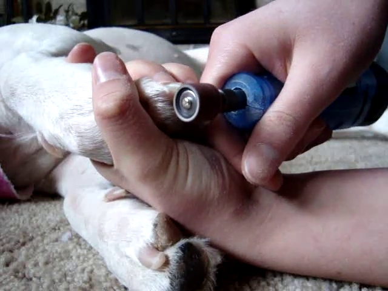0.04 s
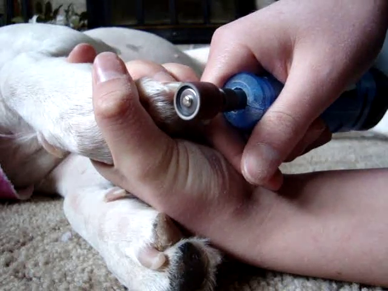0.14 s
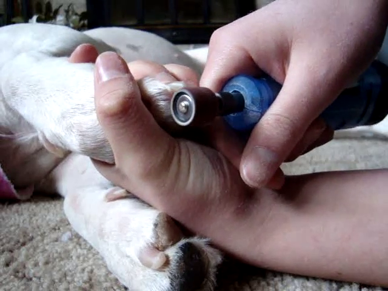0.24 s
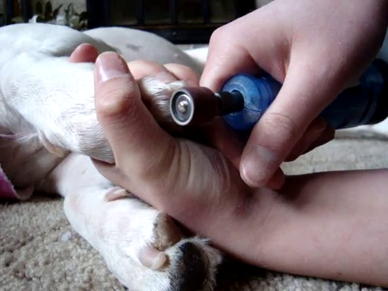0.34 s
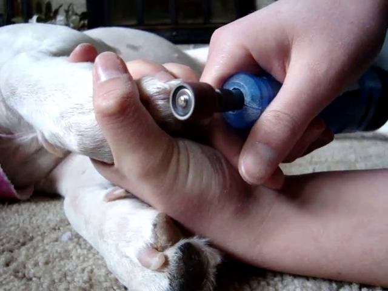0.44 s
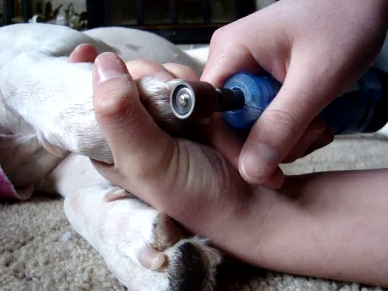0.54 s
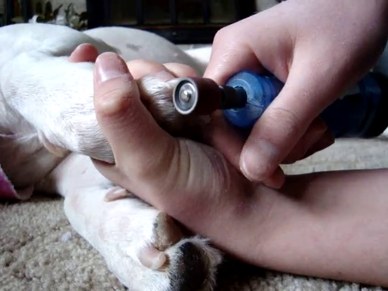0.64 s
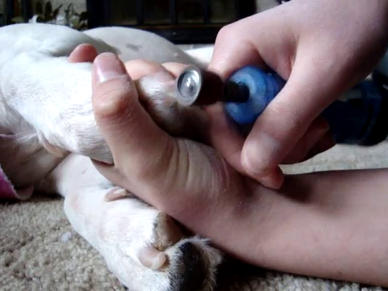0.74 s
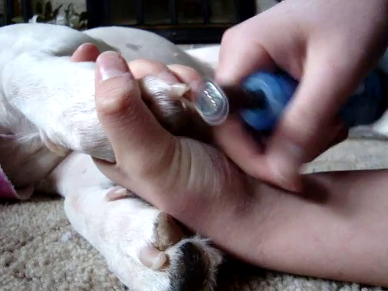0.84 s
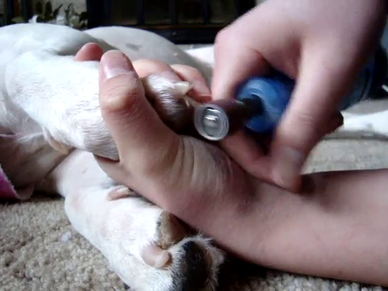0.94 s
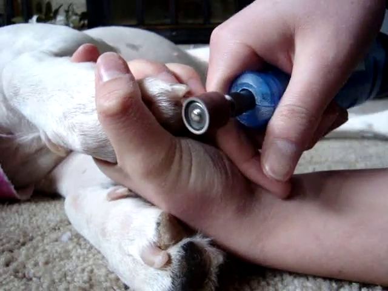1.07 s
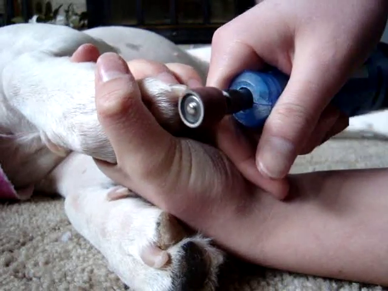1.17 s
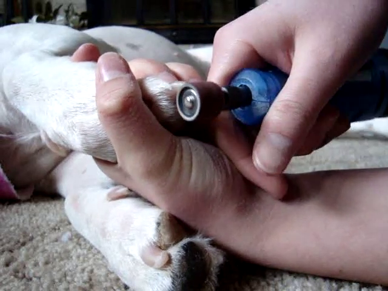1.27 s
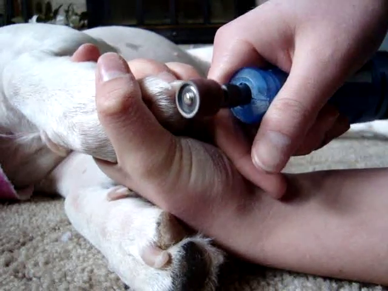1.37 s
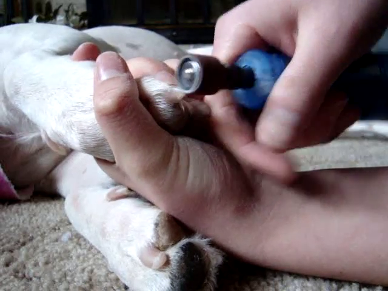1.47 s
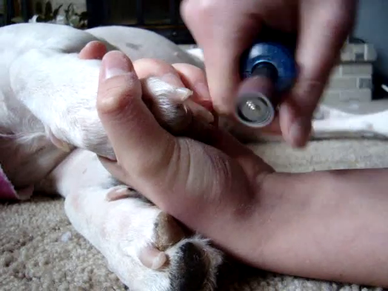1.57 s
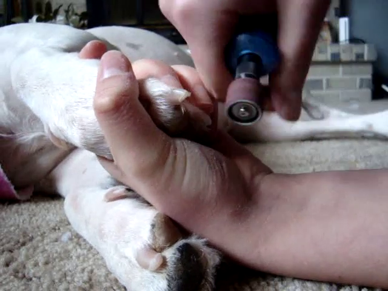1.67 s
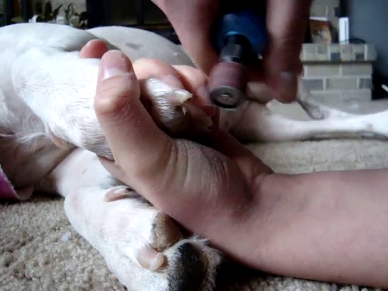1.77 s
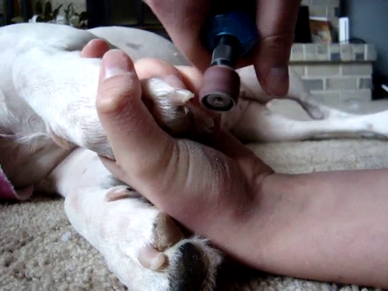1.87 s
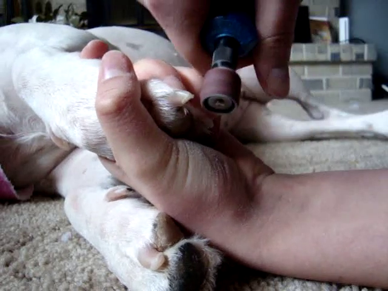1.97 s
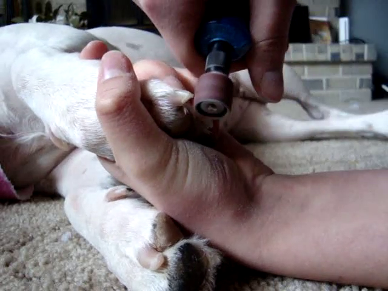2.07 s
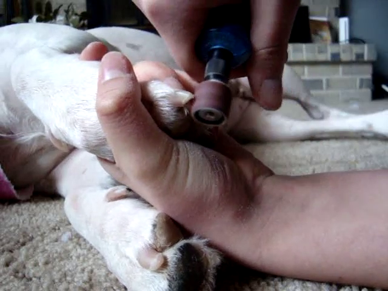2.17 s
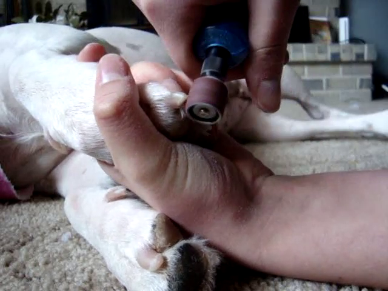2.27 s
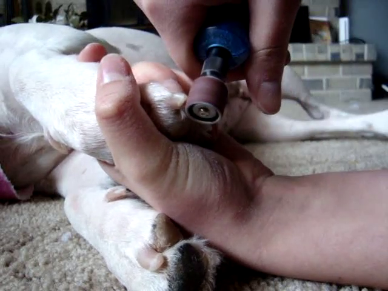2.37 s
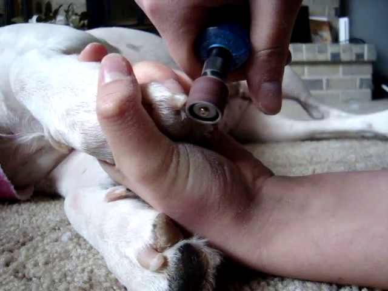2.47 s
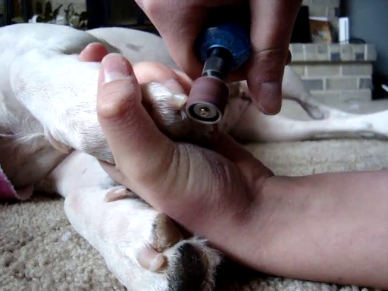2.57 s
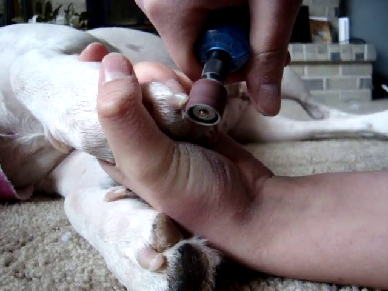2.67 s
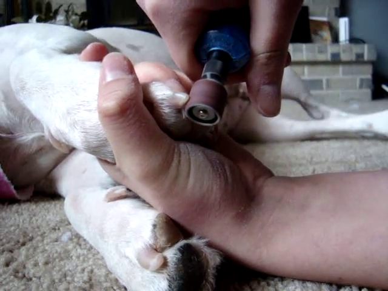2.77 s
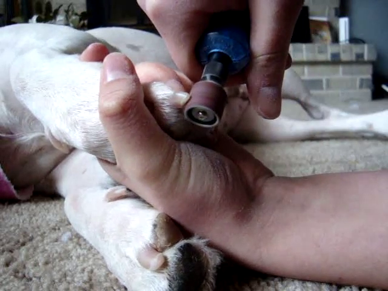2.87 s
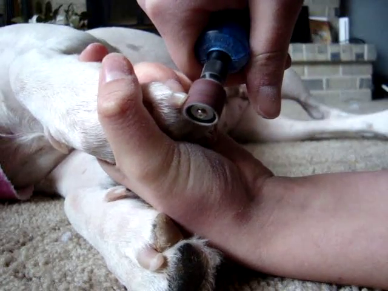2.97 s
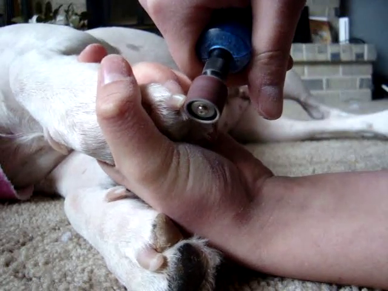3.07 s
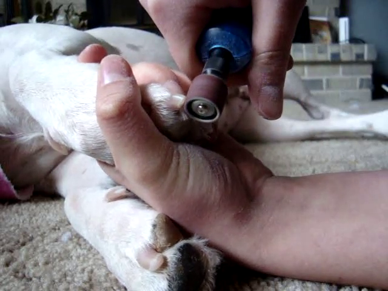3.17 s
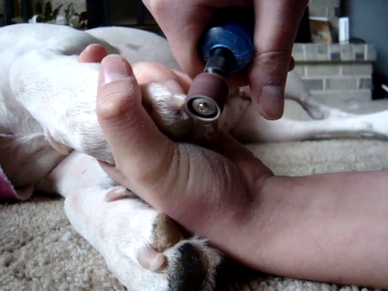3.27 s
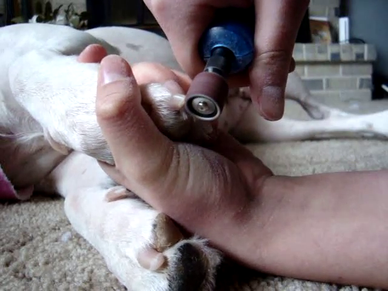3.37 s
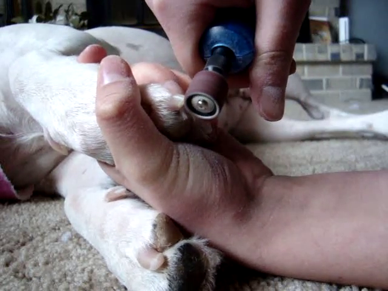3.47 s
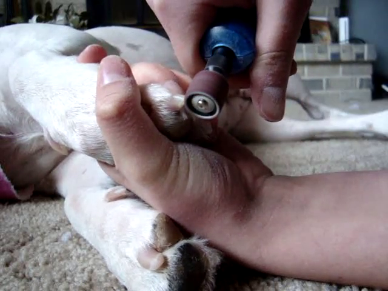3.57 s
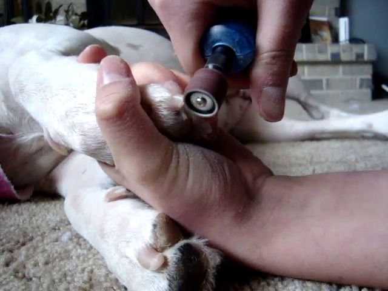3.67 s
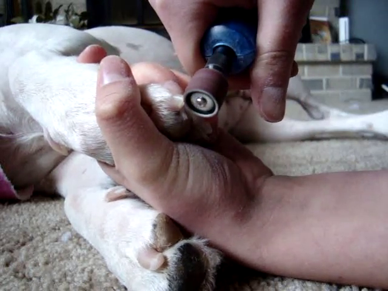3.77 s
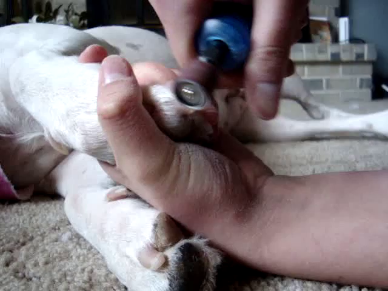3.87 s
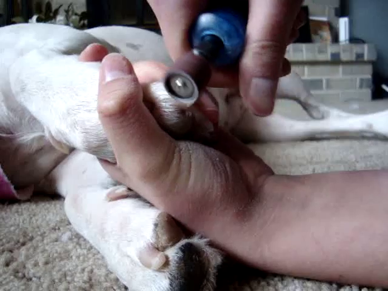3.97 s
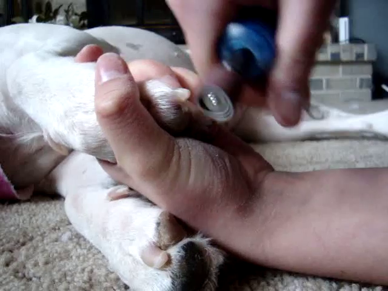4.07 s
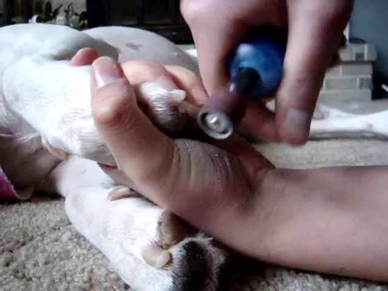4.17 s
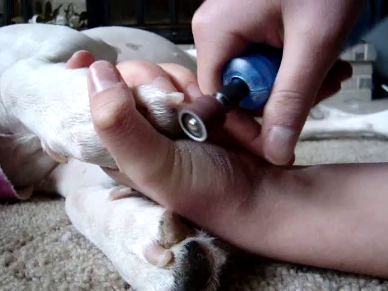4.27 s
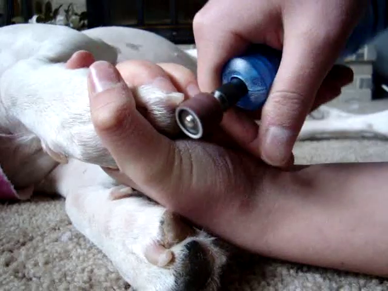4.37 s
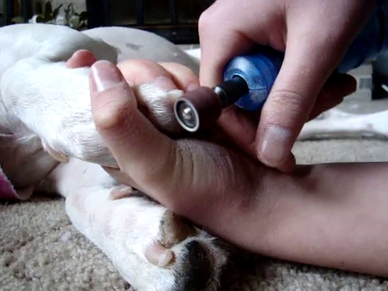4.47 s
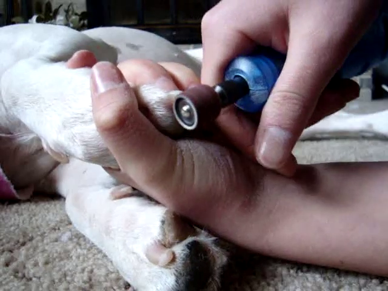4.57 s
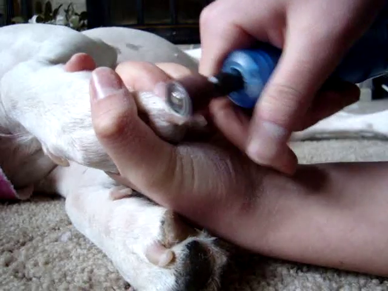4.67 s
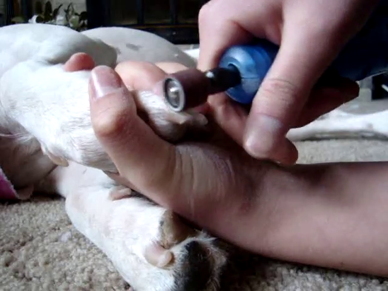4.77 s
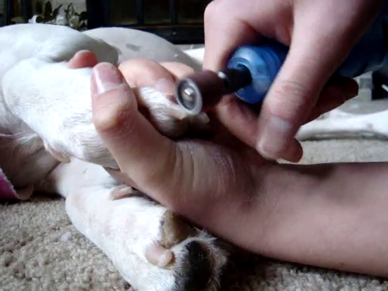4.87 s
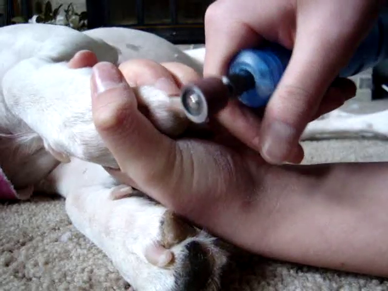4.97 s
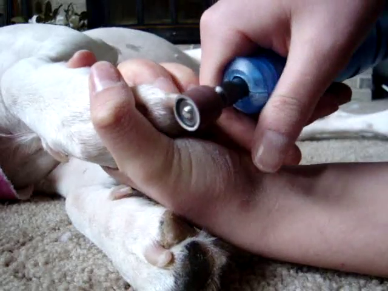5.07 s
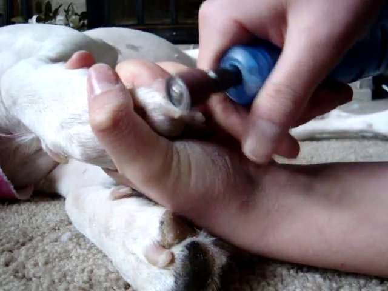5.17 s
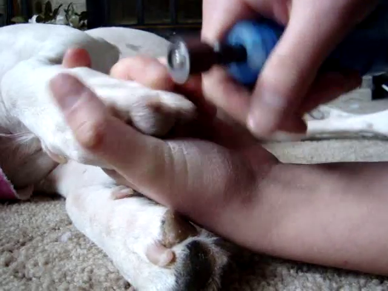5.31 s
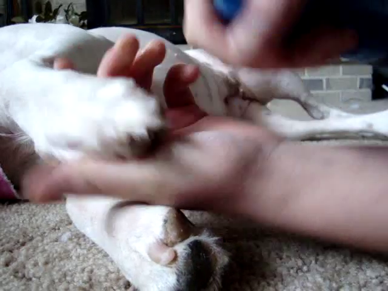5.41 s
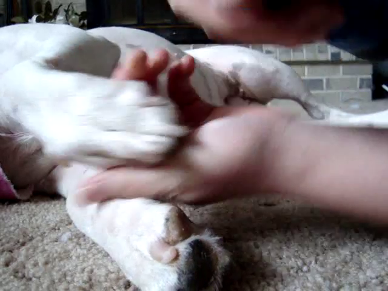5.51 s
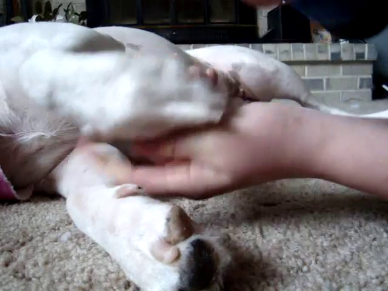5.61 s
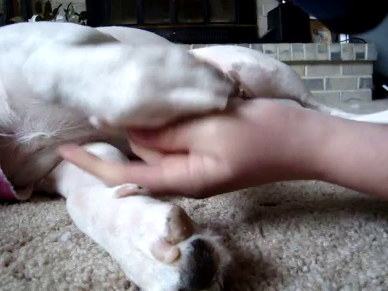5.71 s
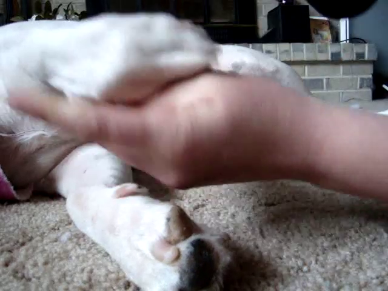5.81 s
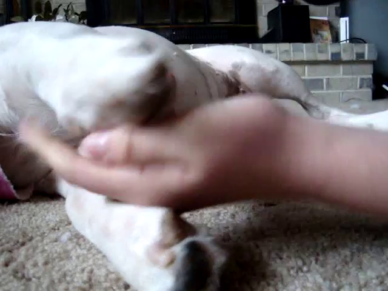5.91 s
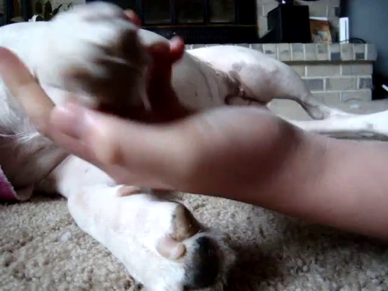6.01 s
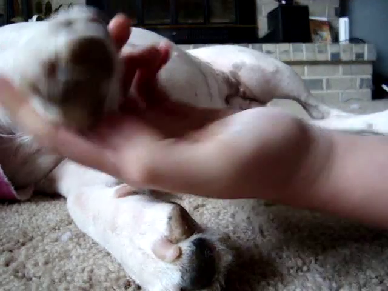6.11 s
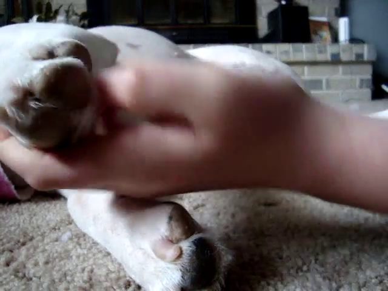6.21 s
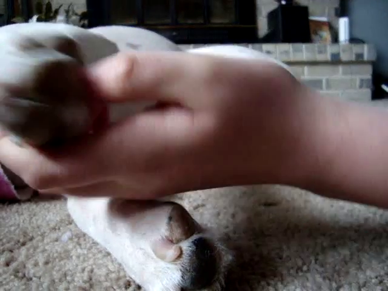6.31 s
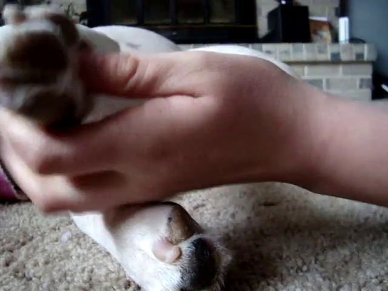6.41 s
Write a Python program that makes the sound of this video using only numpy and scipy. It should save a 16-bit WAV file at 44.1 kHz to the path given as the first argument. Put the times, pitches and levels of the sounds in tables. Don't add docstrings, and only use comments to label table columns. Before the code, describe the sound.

Raspy, ringing bursts of nail grinding interrupt a steady high motor whine, which sags under each contact and climbs back in the pauses.

```python
import sys
import numpy as np
from scipy import signal
from scipy.fft import rfft, irfft, next_fast_len
from scipy.io import wavfile
from scipy.ndimage import uniform_filter1d, map_coordinates

SR = 44100
rng = np.random.default_rng(int(sys.argv[2]) if len(sys.argv) > 2 else 0)


def transcribe(signal):
    frames = np.atleast_2d(signal).T
    limited = np.clip(frames, -1, 1)
    pcm = np.round(limited * 32767).astype(np.int16)
    wavfile.write(sys.argv[1], SR, pcm)


def amplitude_ratio(level_db):
    exponent = np.asarray(level_db, float) / 20
    return 10 ** exponent


N = 284445

# time in seconds, pressure in dB, slip off the
# ringing seat in dB, sharp grit reaching the nail in dB, share of the scrape that repeats each turn (0-1).
SIDE_STROKES = [
    [(0.0, -22, -5.5, -9, 0.95), (0.12, -19, -4.5, -8, 0.99), (0.28, -22, -5.0, -9.5, 0.84),
     (0.355, -17.5, -5.5, -7.5, 0.7), (0.42, -21, -3.5, -8.5, 0.83), (0.79, -19, -5, -6.5, 1),
     (0.85, -18.5, -7, -7.5, 0.27), (0.89, -21.5, -8.5, -7, 0), (0.962, -23.5, -9.5, -6.5, 0.1)],
    [(1.36, -32, -2, -8.5, 0.4), (1.368, -25, -3.5, -8, 0.4), (1.41, -24, -3.5, -8.0, 0.7),
     (1.47, -20.5, -2.5, -6.5, 0.8), (1.524, -17.0, -3.5, -6.5, 0.2), (1.556, -25, -5.5, -3.5, 0.2),
     (1.585, -35.5, -1, -5.5, 0.1)],
]
TIP_STROKES = [
    [(2.342, -22, -8.0, -5.5, 0.51), (2.37, -22, -4.5, -8, 0.54), (2.418, -15, -4.5, -11.5, 0.54),
     (2.6, -16, -3.0, -12, 0.66), (2.7, -17.0, -4.5, -13, 1), (2.92, -18.0, -6.5, -10, 0.81),
     (3.02, -17.0, -9.5, -10, 0.87), (3.09, -16.0, -7, -9.5, 0.92), (3.16, -16.0, -7.5, -5, 1)],
    [(3.165, -16.5, -7.5, -7, 0.95), (3.24, -14.5, -10.5, -14, 0.98), (3.42, -17.5, -5.5, -14.0, 0.95),
     (3.46, -15, -8.5, -16, 0.91), (3.62, -15.5, -4.5, -14.0, 0.86), (3.65, -16.0, -3, -14.0, 0.63),
     (3.965, -16.0, -3, -9.5, 0.5), (4.02, -25.0, -5.5, -9.5, 0.5), (4.075, -28.0, 0, -7, 0.75)],
]
EDGE_STROKES = [
    [(4.525, -26.5, -11, -4, 0.5), (4.54, -24.5, -6.5, -8.0, 0.53), (4.645, -15.5, -5.5, -7.5, 0.44),
     (4.77, -15.5, -6, -10.5, 0.94), (4.812, -15.0, -4.5, -12.5, 0.33), (4.845, -14.5, -12.5, -14.5, 0.86),
     (4.94, -18.0, -6.5, -12.5, 0.79), (5.055, -16.0, -6, -9.5, 0.84), (5.072, -21, -8, -9.5, 0.77)],
    [(5.14, -17, -13, -9.5, 0.5), (5.148, -17.5, -7, -12.5, 0.7), (5.23, -17.5, -9.5, -15, 0.82),
     (5.272, -12.0, -5.5, -10.5, 0.22), (5.302, -15.5, -14.5, -14, 0.74), (5.34, -18.5, -6.5, -15, 0.49),
     (5.374, -24.0, -11, -8.5, 0.33), (5.382, -24.5, -8, -20.5, 0.3)],
]
# frequency in Hz, level in dB per Hz.
SIDE_BODY = [(18, -78), (30, -62), (276, -44.5), (344, -42), (408, -36.5), (890, -35), (1030, -21),
             (1640, -12), (1900, -4.5), (2540, -7), (2800, 0), (3320, -2), (3850, -9), (8810, -17.5),
             (10200, -28), (13300, -73), (22000, -120)]
TIP_BODY = [(18, -99), (30, -75), (398, -48.5), (574, -43), (958, -42.5), (1060, -24.5), (1310, -28.5),
            (1760, -15.5), (2540, -13.5), (2870, 0.5), (3490, -21), (4450, -15), (5680, -26), (8600, -25.5),
            (10200, -34), (13300, -68), (22000, -120)]
EDGE_BODY = [(18, -77), (30, -54), (169, -63), (912, -38), (1110, -17), (1450, -22), (1810, -8), (2300, -3),
             (2540, -9.5), (3160, 3), (3850, -8.5), (5540, -10), (7250, -19), (8390, -15.5), (10200, -30),
             (13300, -67), (22000, -120)]
# order in cycles per turn, level in dB over the ring.
SIDE_SONG = [
    [(16, -5), (24, -13), (29, -7), (20, -16), (15, -12), (9, -27.5)],
    [(15, -5), (9, -6), (24, -10)],
]
TIP_SONG = [
    [(24, -9.5), (25, -11.5), (20, -9), (9, -28.5), (15, -22.5), (19, -10.5)],
    [(24, -4.5), (25, -6), (20, -13), (13, -18), (15, -17), (23, -13)],
]
EDGE_SONG = [
    [(26, -5), (18, -13.5), (15, -14.5)],
    [(26, -7.5), (15, -10)],
]
# time in seconds, speed in turns per second.
SIDE_SHAFT = [
    [(0, 117.6), (.09, 115.9), (.32, 117), (.38, 121.9), (.43, 119.2), (.49, 120.8), (.65, 116.7),
     (.86, 114.5), (.975, 128)],
    [(1.355, 133.6), (1.42, 127.3), (1.47, 120.9), (1.52, 124.7), (1.58, 127.3)],
]
TIP_SHAFT = [
    [(2.335, 133.6), (2.39, 128.5), (2.43, 120.6), (2.51, 115.9), (2.62, 112.6), (2.8, 122.4),
     (2.96, 117.8), (3.02, 123.3), (3.14, 113.5)],
    [(3.15, 114.2), (3.23, 115.5), (3.32, 114.5), (3.59, 118.5), (3.65, 115.5), (3.92, 111.7),
     (3.95, 115.5), (4.02, 119.3), (4.085, 128.9)],
]
EDGE_SHAFT = [
    [(4.515, 133.4), (4.58, 129.6), (4.71, 118.8), (4.78, 109.6), (4.87, 112), (4.96, 123.6), (5.06, 125.3),
     (5.08, 127.9)],
    [(5.135, 131.9), (5.19, 124.9), (5.23, 124), (5.3, 115.5), (5.39, 128.5)],
]
# time in seconds, peak level in dB.
SNAGS = [
    (0.866, 1),
    (1.524, -6),
    (3.744, -7.5),
    (3.969, -1.5),
    (4.809, 1),
    (5.274, -5.5),
]
# frequency in Hz, level in dB.
KNOCK = [(100, -43), (500, -24), (1200, -10), (2000, -4), (3000, 2), (4500, -7), (7000, -16), (10200, -31)]
# time in seconds, peak level in dB, ring in Hz.
GRAZES = [
    (2.2119, -25, 3000),
    (2.219, -25, 2996),
    (2.226, -28.5, 2977),
    (2.244, -35.5, 2790),
    (2.2584, -49, 2810),
]
# order in cycles per turn, level in dB over the whirr.
FLANKS = [(7, -23), (8, -12.5), (10, -7.5), (11, -21.5), (14, -22), (16, -23), (18, -19), (26, -13),
          (27, -9.5), (30, -9), (33, -13), (36, -13), (42, -18.5), (43, -18.5), (45, -19.5), (48, -16.5),
          (54, -20.5), (60, -15), (72, -21.5)]
# time in seconds, nearness in dB, strong orders in dB over the whirr,
# turn from the 9th to the 15th order in dB, uncovering of the top in dB.
HOLD = [(1.0, 0.5, -2.5, 4, -2.5), (1.35, -2, 1.5, 1.5, 1.5), (1.62, 2, -0.5, 4.5, 2.5),
        (1.68, 0, -0.5, 0, 1), (1.76, 0, 6, 2.5, -2), (1.91, 0, 3, -3, 2), (1.97, 0, 1, 2.5, 2),
        (2.14, 1, -2.5, -7, 1), (2.33, 1, 3, -6.5, -2), (4.2, 0, 0, -2.5, -1.5), (4.36, 2.5, -3, -1, -5.5),
        (4.5, 3, -3, 1.5, -3.5), (5.1, -1.5, 2, 6, -4.5), (5.42, 1.5, -3.5, 4, 2), (5.57, 1.5, 1, 4.5, 4.5),
        (5.74, 2, 5, 2.5, -2), (6.15, -0.5, 6.5, 4, 1.5), (6.43, -0.5, 8, 4, 3.5)]
# frequency in Hz, level in dB.
CASING = [(200, -56.5), (900, -19), (1300, -14.5), (1600, -2), (2300, -4), (3000, -8), (3700, 0.5),
          (6000, -0.5), (10000, -4), (12000, -28)]
# frequency in Hz, level in dB per Hz.
AIR = [(18, -89.5), (30, -31), (981, -18), (1190, -11.5), (1760, -30.5), (1990, -21.5), (2250, -16),
       (2480, -29), (2940, -29), (3570, -18.5), (10200, -17), (13300, -61), (22000, -120)]
# order in cycles per turn, start in seconds, end
# in seconds, level in dB.
LOW_ORDERS = [
    (3, -.1, .3, -62.5),
    (9, 2.55, 3.08, -33.5),
    (9, .2, .86, -40),
    (5, 3.2, 3.97, -55.5),
    (5, 5.27, 5.39, -55),
]

FREE_HZ, SPIN_UP_S = 133.6, 0.04
WHIRR_DB, DUCK_DB, RECOVER_S = -43.5, 7, 0.48
TOUCH_S = 0.006
STEPS = 384


def grinding(turns, grit, contacts, body, songs, lump_db, jolt_db, thud_base_db):
    pressure_db, slip_db, fizz_db, repeated = curves(np.concatenate(contacts))
    touches = [gate(c[0][0] + TOUCH_S / 2, c[-1][0], TOUCH_S, TOUCH_S) for c in contacts]
    high_spot = np.cos(2 * np.pi * (turns + 0.14 * wobble(5.2)))
    share = np.clip(repeated, 0, 1)

    chip_db = jolt_db * wobble(45) + 3.7 * rng.standard_normal(N)
    chips = unit(amplitude_ratio(chip_db) * rng.standard_normal(N))
    scrape = np.sqrt(share) * grit + np.sqrt(1 - share) * chips
    dust = amplitude_ratio(1.25 * high_spot) * (scrape + 0.45 * chips)
    layers = np.array([chips + 3.2 * scrape, scrape, scrape, dust])
    bite = amplitude_ratio(lump_db * (0.5 + share ** 2) * high_spot)
    bands = split(bite * layers, body, edges_hz=[900, 2500, 3700])

    ring_db = 10 * np.log10(np.clip(1 - amplitude_ratio(slip_db) ** 2 - amplitude_ratio(fizz_db) ** 2, 0.1, 1))
    sung = np.zeros(N)
    song_tone = np.zeros(N)
    for touch, song in zip(touches, songs):
        for k, db in song:
            sung += touch * amplitude_ratio(2 * db)
            level = touch * amplitude_ratio(db + 2.6 * wobble(9))
            phase = 2 * np.pi * k * (turns + 0.0076 * wobble(30))
            song_tone += level * np.sqrt(2) * np.cos(phase)
    left_db = 10 * np.log10(np.clip(1 - 0.7 * share ** 4 * sung, 0.2, 1))
    singing = share ** 2 * amplitude_ratio(ring_db) * song_tone

    thud_db = thud_base_db + 0.45 * slip_db + 6 * (1 - share)
    sputter_db = 2.2 * (1.3 - share) * wobble(85)
    levels_db = [thud_db, slip_db, ring_db + left_db, fizz_db + sputter_db]
    scraping = 0.84 * sum(amplitude_ratio(db) * steady(band) for db, band in zip(levels_db, bands))
    return amplitude_ratio(pressure_db) * (np.minimum(sum(touches), 1) * scraping + singing)


def snags():
    out, t = np.zeros(N), np.arange(600) / SR
    for s, db in SNAGS:
        out[round(s * SR):][:len(t)] += amplitude_ratio(db - 1.0 - 60 * t / 0.025) * rng.standard_normal(len(t))
    return filtered(out, lambda hz: amplitude_ratio(along(KNOCK, hz)))


def grazes():
    out, t = np.zeros(N), np.arange(400) / SR
    blip = amplitude_ratio(-60 * t / 0.009) * (1 - np.exp(-t / 0.0012))
    for s, db, hz in GRAZES:
        ring = np.sin(2 * np.pi * hz * t) + 0.15 * np.diff(rng.standard_normal(len(t) + 1))
        out[round(s * SR):][:len(t)] += amplitude_ratio(db + 15.5) * blip * ring
    return out


def shaft():
    t, speed_hz = np.arange(N) / SR, np.zeros(N)
    for stroke in SIDE_SHAFT + TIP_SHAFT + EDGE_SHAFT:
        lag = np.exp(-np.maximum(t - stroke[-1][0], 0) / SPIN_UP_S)
        sagging_hz = FREE_HZ - (FREE_HZ - curves(stroke)[0]) * lag
        speed_hz = np.where((t >= stroke[0][0]) | (speed_hz == 0), sagging_hz, speed_hz)
    return speed_hz


def motor(turns, speed_hz):
    near_db, strong_db, turn_db, shading_db = curves(HOLD)
    free_s = since_contact()
    whirr_db = WHIRR_DB + near_db - DUCK_DB * np.exp(-free_s / RECOVER_S)
    vent_db = -6.5 + 10 * np.exp(-free_s / 0.036) + 2.9 * wobble(4)
    upper_db = -7.5 + 0.5 * shading_db + 1.6 * wobble(5)
    top_db = -5 + shading_db + 1.0 * wobble(5.03)
    orders = whine(turns, speed_hz, near_db, strong_db, turn_db, upper_db, top_db)

    whirr = revolving(turns, likeness=0.96, spiky_db=5)
    whirr = unit(filtered(whirr, lambda hz: amplitude_ratio(along(CASING, hz))))
    bands = split(whirr + 0.73 * unit(fan_hiss()), [(1, 0)], edges_hz=[2200, 3300, 5200, 7000])
    levels_db = [-8, vent_db, -3, upper_db, top_db]
    casing = sum(amplitude_ratio(db) * band for db, band in zip(levels_db, bands))
    return amplitude_ratio(whirr_db) * (orders + casing)


def whine(turns, speed_hz, near_db, strong_db, turn_db, upper_db, top_db):
    strong = amplitude_ratio(-turn_db) * order(turns, 9) + amplitude_ratio(turn_db) * order(turns, 15)
    out = amplitude_ratio(strong_db) * strong
    load_db = 0.58 * np.minimum(speed_hz - 132.5, 0)
    beam_db = 2.2 * np.maximum(strong_db + turn_db - 8, 0)
    for k, db in FLANKS:
        level_db = db + load_db + 2.5 * wobble(1.85)
        if k > 52:
            level_db = level_db + top_db + 8
        elif k > 38:
            level_db = level_db + upper_db + 8
        if k in (26, 27, 30):
            level_db = level_db + 1.3 * near_db
        if k in (42, 43, 72):
            level_db = level_db + beam_db
        out += amplitude_ratio(level_db) * order(turns, k)
    return out


def low_orders(turns):
    out = np.zeros(N)
    for k, start_s, end_s, db in LOW_ORDERS:
        swell_s = 0.21 * (end_s - start_s)
        pressed = gate(start_s + swell_s, end_s, swell_s, 0.03)
        out += amplitude_ratio(db + 1.5 * wobble(11)) * pressed * order(turns, k)
    return out


def fan_hiss():
    return amplitude_ratio(0.88 * wobble(5.3)) * filtered(rng.standard_normal(N), lambda hz: amplitude_ratio(along(AIR, hz)))


def since_contact():
    t = np.arange(N) / SR
    strokes = SIDE_STROKES + TIP_STROKES + EDGE_STROKES
    touching = sum(gate(c[0][0], c[-1][0], TOUCH_S, TOUCH_S) for c in strokes) > 0
    return t - np.maximum.accumulate(t * touching)


def order(turns, k):
    return np.sqrt(2) * np.sin(2 * np.pi * (k * turns + rng.random()))


def revolving(turns, likeness, spiky_db):
    spikes = amplitude_ratio(spiky_db * rng.standard_normal((900, STEPS)))
    fresh = rng.standard_normal((900, STEPS)) * spikes
    keep = min(likeness, 0.995)
    fresh[1:] *= np.sqrt(1 - keep ** 2)
    pattern = signal.lfilter([1], [1, -keep], fresh, axis=0)
    return unit(map_coordinates(pattern.ravel(), [turns * STEPS]))


def split(x, spectrum, edges_hz):
    def response(hz):
        steps = [1 + 0 * hz] + [above(hz, edge) for edge in edges_hz] + [0 * hz]
        return -amplitude_ratio(along(spectrum, hz)) * np.diff(steps, axis=0)
    return [unit(band) for band in filtered(x, response)]


def above(hz, edge_hz):
    return 1 / (1 + (edge_hz / (hz + 1)) ** 16)


def filtered(x, response):
    m = next_fast_len(N + 8192)
    return irfft(rfft(x, m) * response(np.fft.rfftfreq(m, 1 / SR)), m)[..., :N]


def along(points, hz):
    f, v = np.transpose(points)
    return np.interp(np.log(hz + 1), np.log(f + 1), v)


def curves(rows):
    s, *cols = np.transpose(rows)
    return [np.interp(np.arange(N) / SR, s, c) for c in cols]


def wobble(rate):
    coarse = np.arange(0, N + 32, 32)
    knots = rng.standard_normal(N // 100)
    return np.interp(np.arange(N), coarse, map_coordinates(knots, [coarse * rate / SR]))


def gate(start_s, end_s, rise_s, fall_s):
    t = np.arange(N) / SR
    return np.clip(np.minimum((t - start_s) / rise_s, (end_s - t) / fall_s) + 1, 0, 1)


def steady(x, size=3500):
    return x / np.sqrt(np.abs(uniform_filter1d(x ** 2, size)) + 1e-9)


def unit(x):
    return x / np.sqrt(np.mean(x ** 2) + 1e-20)


def scene():
    speed_hz = shaft()
    turns = np.cumsum(speed_hz * (1 + 0.00043 * wobble(25.04))) / SR
    grit = revolving(turns, likeness=0.918, spiky_db=5.5)
    side = grinding(turns, grit, SIDE_STROKES, SIDE_BODY, SIDE_SONG, lump_db=0.6, jolt_db=1.0, thud_base_db=-34.5)
    tip = grinding(turns, grit, TIP_STROKES, TIP_BODY, TIP_SONG, lump_db=1.0, jolt_db=1.5, thud_base_db=-38)
    edge = grinding(turns, grit, EDGE_STROKES, EDGE_BODY, EDGE_SONG, lump_db=0.5, jolt_db=1.0, thud_base_db=-34.5)
    nail = side + tip + edge + snags() + grazes()
    return (nail + motor(turns, speed_hz) + low_orders(turns))[None]


def top_cut(x):
    return signal.sosfilt(signal.butter(12, 11100, fs=SR, output="sos"), x)


def record(dry):
    rounded = dry / (1 + np.abs(dry / 0.68) ** 5) ** (1 / 5)
    onset = np.minimum(np.arange(N) / 60, 1)
    passed = filtered(rounded, lambda hz: (hz < 10130) / np.sqrt(1 + (30 / (hz + 1)) ** 2))
    return top_cut(onset * passed)


dry = scene()
out = record(dry)
transcribe(out)
```